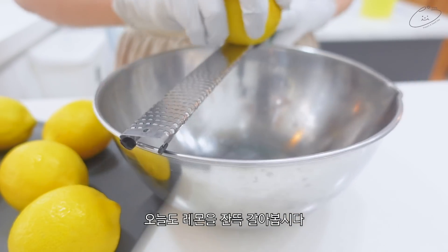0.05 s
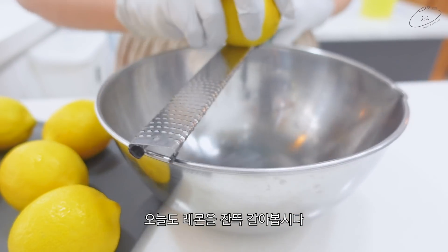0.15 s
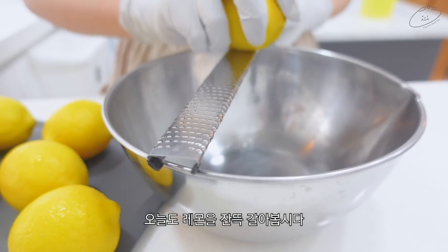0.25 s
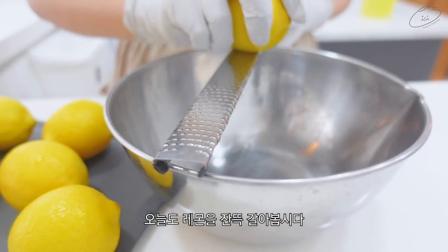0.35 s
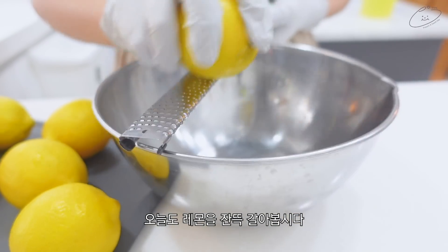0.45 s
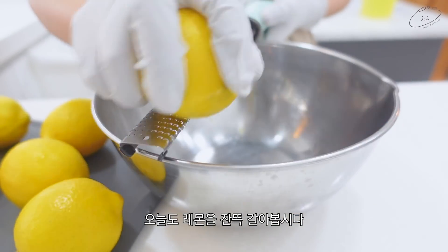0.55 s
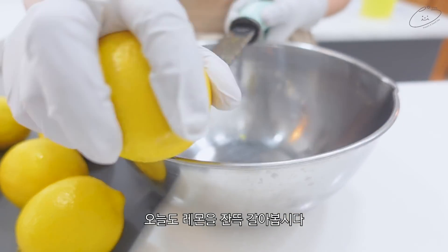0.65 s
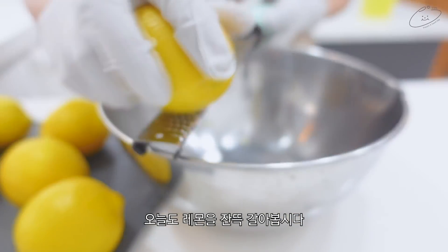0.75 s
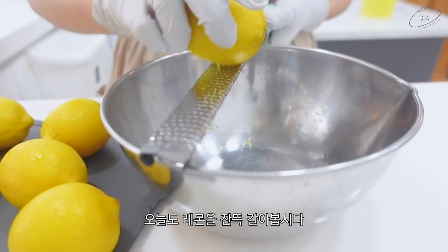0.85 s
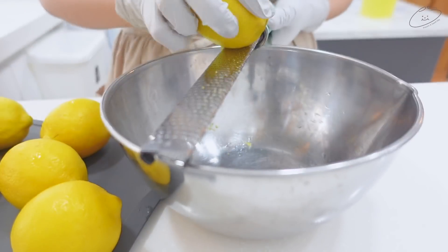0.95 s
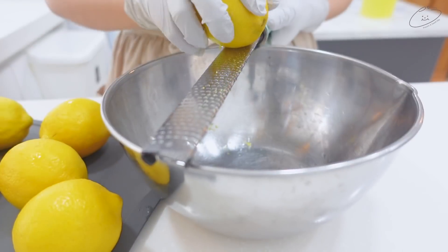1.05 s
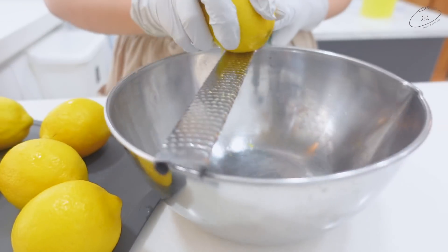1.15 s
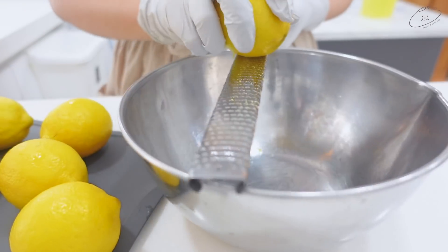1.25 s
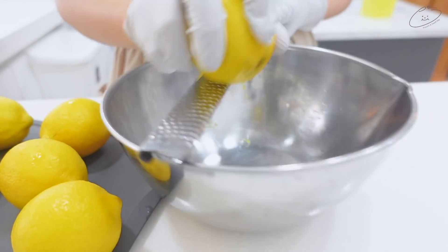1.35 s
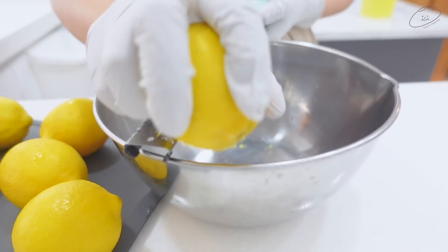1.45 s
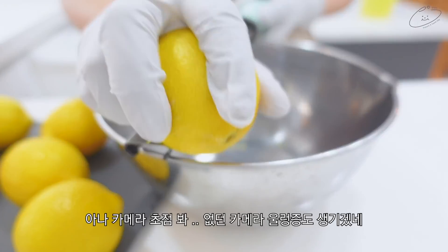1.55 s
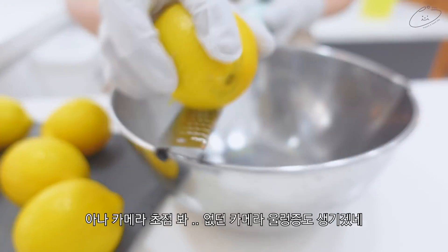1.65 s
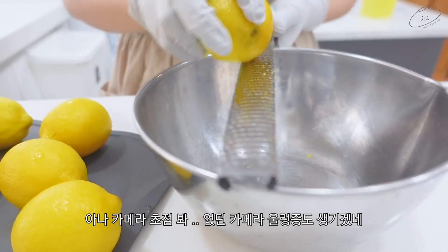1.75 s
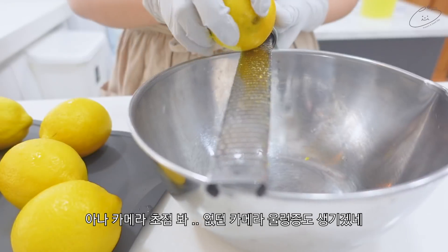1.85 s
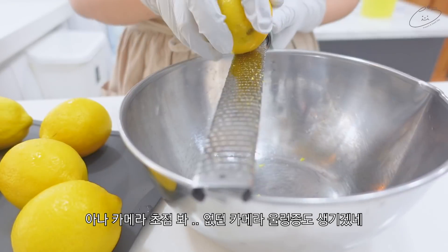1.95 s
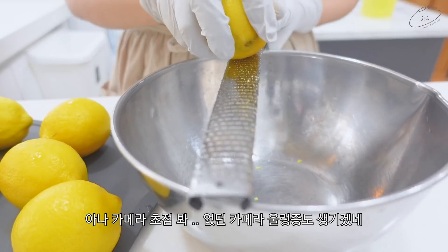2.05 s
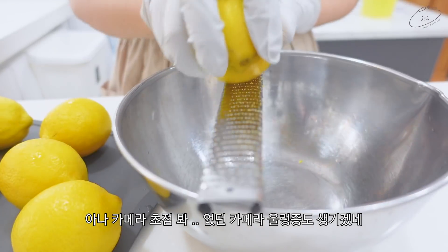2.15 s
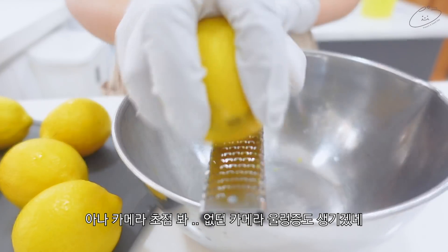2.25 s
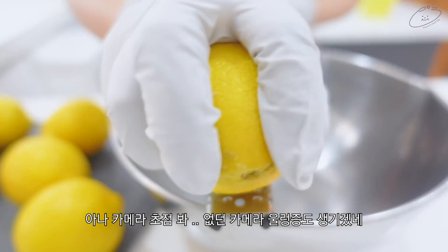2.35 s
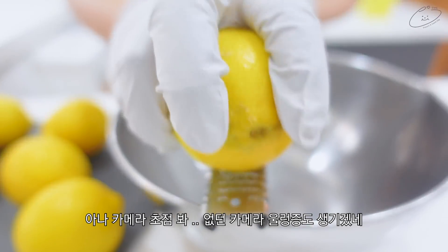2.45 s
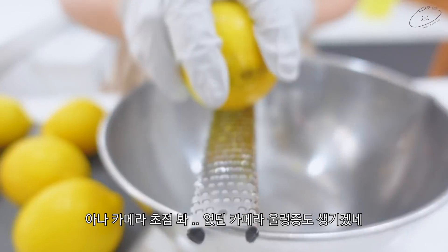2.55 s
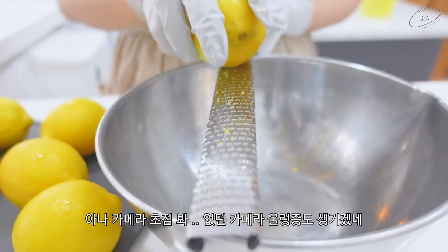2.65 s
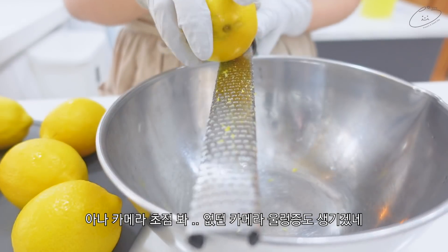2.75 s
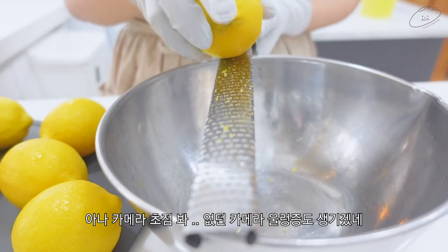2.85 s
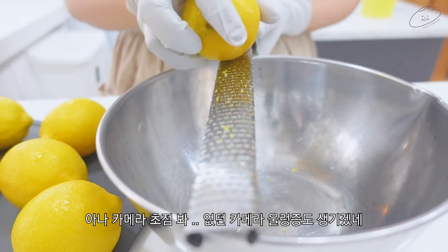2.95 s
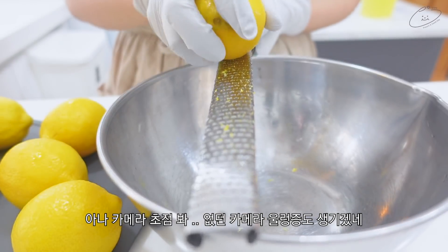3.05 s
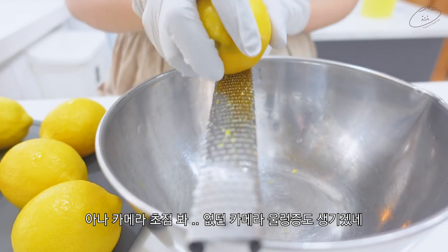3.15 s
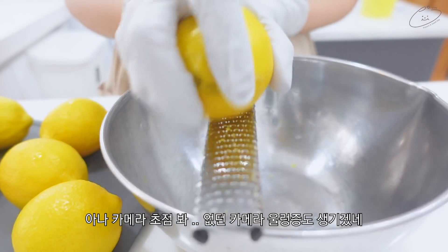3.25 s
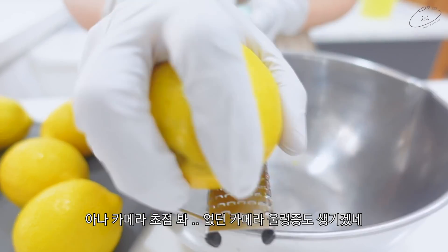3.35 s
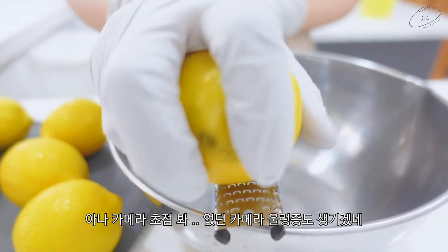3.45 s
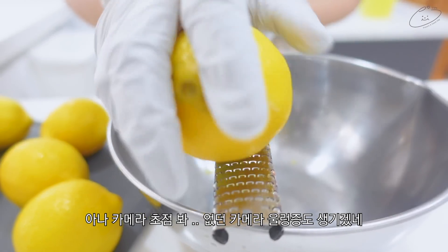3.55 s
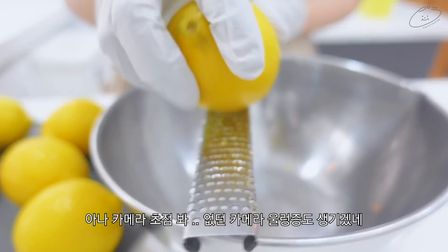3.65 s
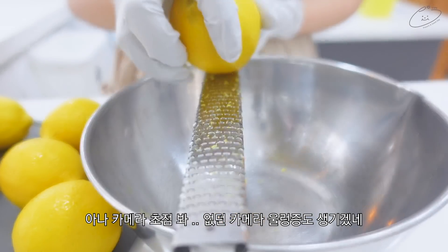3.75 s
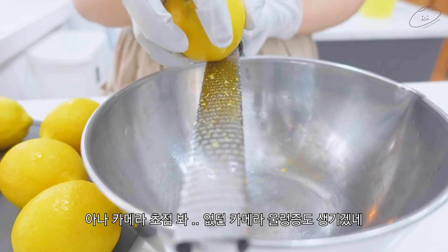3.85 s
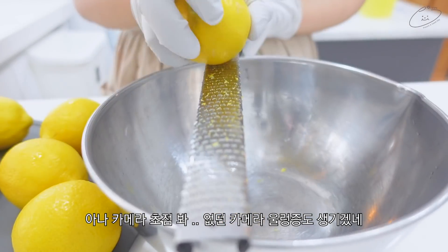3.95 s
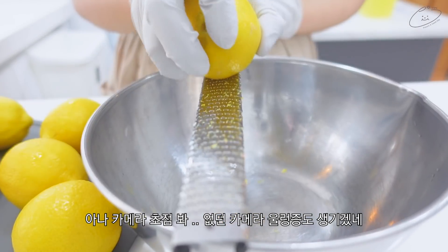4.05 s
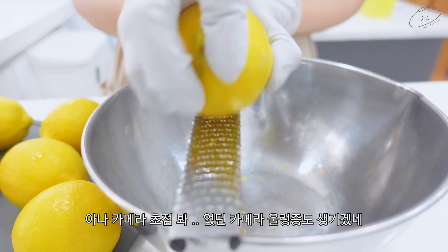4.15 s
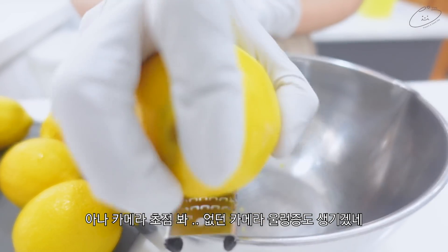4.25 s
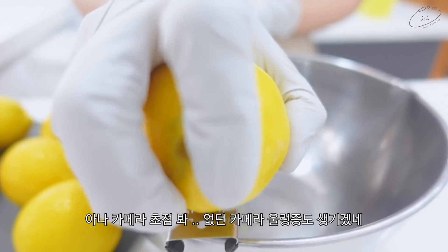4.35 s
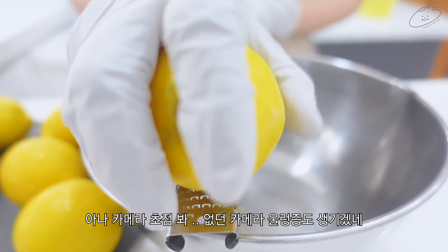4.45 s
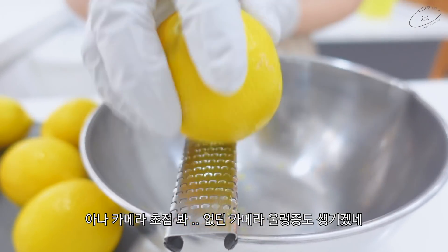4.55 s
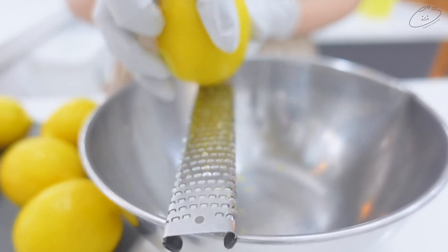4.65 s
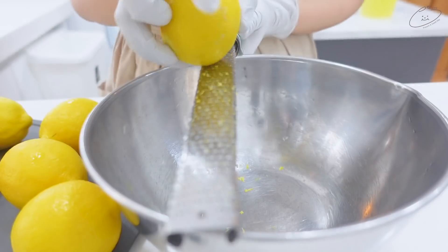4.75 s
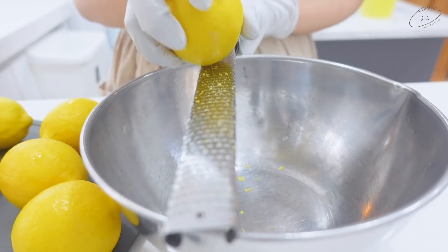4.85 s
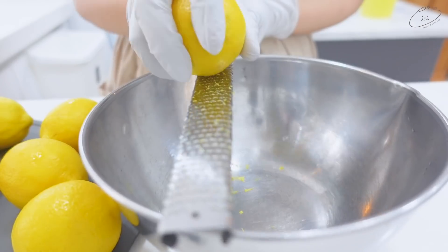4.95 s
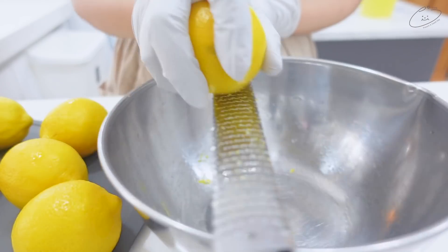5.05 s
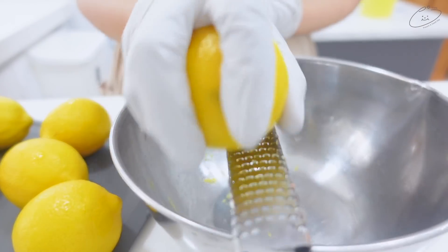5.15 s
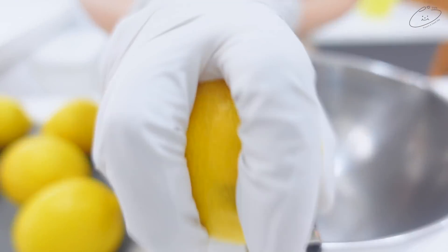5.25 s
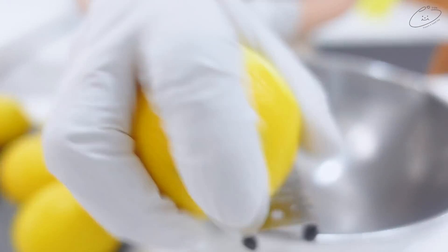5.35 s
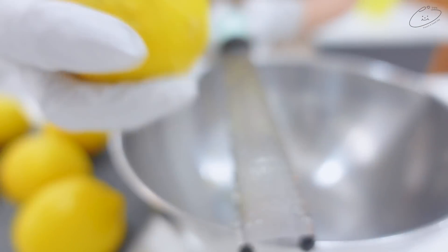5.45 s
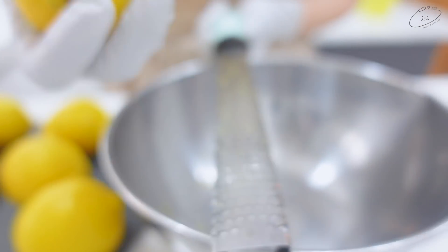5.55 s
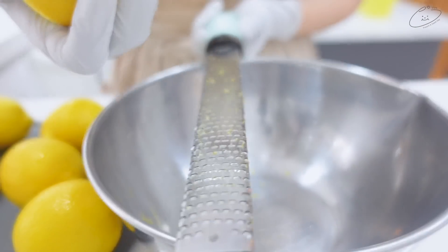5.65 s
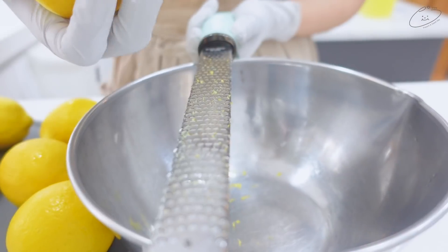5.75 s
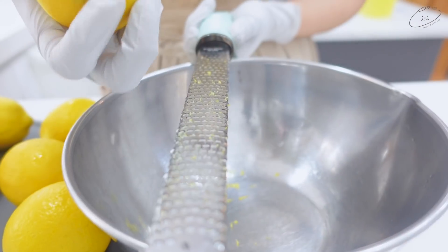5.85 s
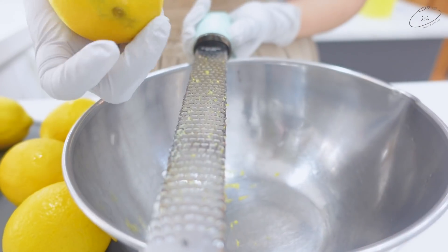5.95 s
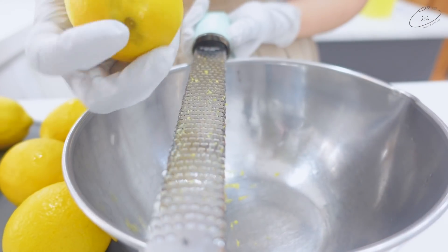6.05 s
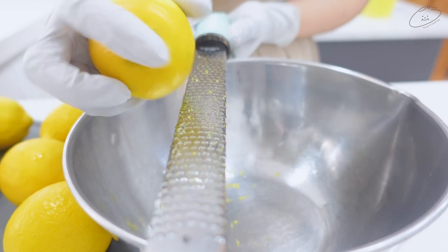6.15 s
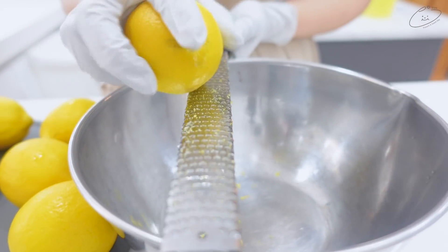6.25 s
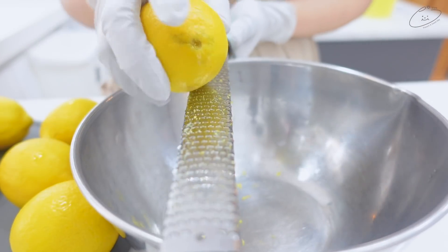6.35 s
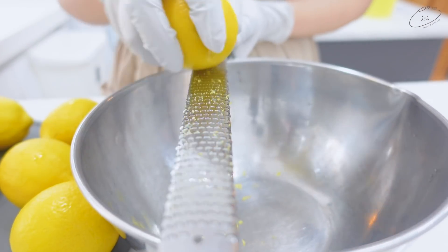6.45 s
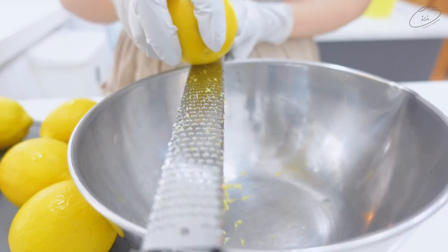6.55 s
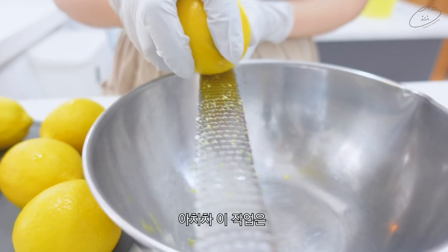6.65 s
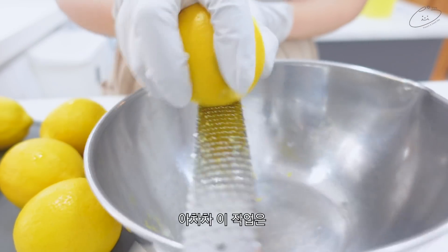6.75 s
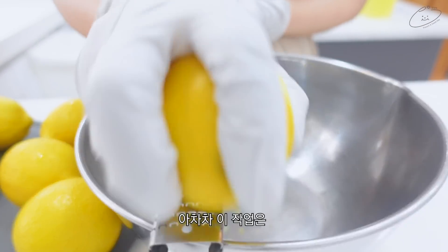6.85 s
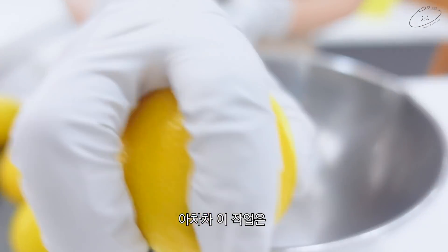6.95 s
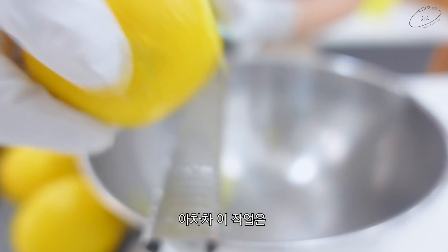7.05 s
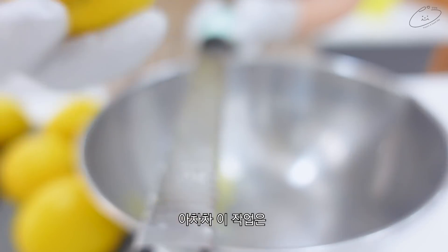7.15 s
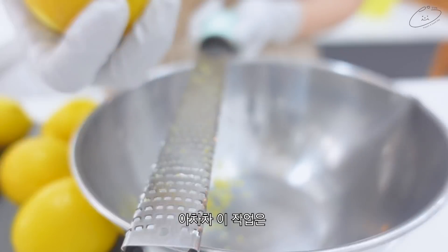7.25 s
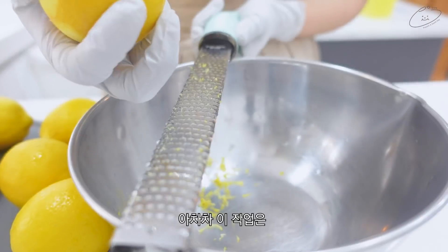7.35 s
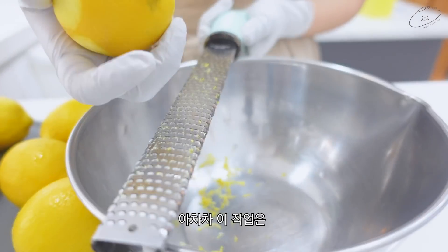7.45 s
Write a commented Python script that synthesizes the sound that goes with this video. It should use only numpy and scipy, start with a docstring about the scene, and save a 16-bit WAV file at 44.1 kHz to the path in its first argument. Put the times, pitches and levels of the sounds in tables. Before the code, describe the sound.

A lemon is grated close by, in seven short, crisp rasps that make a steel grater ring. The strokes come at about 0.4, 1.3, 2.1, 3.1, 4.0, 5.1 and 6.7 seconds, each lasting roughly a third of a second. The peel snags with a sharp knock at 0.5 seconds. Between strokes a rubber glove crinkles softly, with tiny snaps and a faint, thin squeak or two, and the lemon skims lightly back up the teeth. The grater clinks on the rim of a metal bowl several times between 1.8 and 3.2 seconds, then in a quick cluster from 4.6 to 5 seconds, strongest near 4.8. After a quieter stretch of rustling, the last stroke is the loudest, with jolting knocks and a clink around 6.9 seconds. Underneath is a quiet kitchen's low rumble, and a low hum swells twice between 1 and 2.5 seconds.

```python
"""Grating a lemon over a steel bowl

A gloved hand draws a lemon seven times down a steel grater whose foot rests on the rim of a bowl.
The teeth snap through the peel and make the blade ring; now and then the peel snags and jolts it.
Between strokes the glove rustles and squeaks, the lemon skims back up and the grater taps the rim.
We listen from close by, in a quiet kitchen with a low rumble and a hum that swells twice."""
import sys
import numpy as np
from scipy import signal
from scipy.fft import rfft, irfft
from scipy.io import wavfile
from scipy.ndimage import uniform_filter1d

SR = 44100
rng = np.random.default_rng(int(sys.argv[2]) if len(sys.argv) > 2 else 0)


def to_wav(sig):
    """Store sig (one row per channel, or 1-D mono) as 16-bit WAV at the path in sys.argv[1].

    Samples outside -1..1 are clipped; the rate is SR.
    """
    pcm = np.clip(np.atleast_2d(sig), -1, 1) * 32767
    pcm = np.round(pcm).astype(np.int16)
    wavfile.write(sys.argv[1], SR, pcm.T)  # frames by channels


N = 330353
TIME = np.arange(N) / SR  # seconds since the scene began
RING = TIME[:SR // 3]  # seconds since a blow, for short sounds


def undb(db):
    """Turn decibels into a number to multiply by."""
    return 10 ** (np.asarray(db) / 20)


def unit(x):
    """Scale a sound so that its average size (rms) is 1."""
    return x / np.sqrt(np.mean(x ** 2))


def band(x, lo, hi, order=2):
    """Keep what lies between two frequencies."""
    return signal.sosfilt(signal.butter(order, [lo, min(hi, SR * .49)], "band", fs=SR, output="sos"), x)


def highpass(x, hz, order=4):
    """Keep what lies above a frequency."""
    return signal.sosfilt(signal.butter(order, hz, "high", fs=SR, output="sos"), x)


def resonance(x, hz, width):
    """Ring at one pitch; the smaller the width in Hz, the longer the ring."""
    return signal.lfilter(*signal.iirpeak(hz, hz / width, fs=SR), x)


def colour(x, points, size=4096):
    """Shape the tone of a sound along a curve of (frequency [Hz], level [dB]) points."""
    hz, db = np.transpose(points)
    freqs = np.maximum(np.fft.rfftfreq(size, 1 / SR), 1)
    gains = undb(np.interp(np.log(freqs), np.log(hz), db))
    # build the filter so that it never sounds before its input does
    cepstrum = irfft(np.log(gains))
    cepstrum[1:size // 2] *= 2
    cepstrum[size // 2 + 1:] = 0
    response = irfft(np.exp(rfft(cepstrum)))
    return signal.fftconvolve(x, response)[:len(x)]


def walk(rate, size=N):
    """A smooth random wobble of size 1 that turns `rate` times a second."""
    step = max(int(SR / rate), 2)
    stairs = np.repeat(rng.standard_normal(size // step + 1), step)
    return unit(uniform_filter1d(stairs, step)[:size])


def grains(rate, spread_db):
    """Random clicks of uneven size, about `rate` a second."""
    clicks = (rng.random(N) < rate / SR) * rng.choice([-1, 1], N)
    sizes = undb(spread_db * np.clip(rng.standard_normal(N), -2, 2))
    return unit(clicks * sizes)


def fade(t60):
    """Die away by 60 dB in t60 seconds, the fade time."""
    return np.exp(-np.log(1000) * RING / t60)


def ramp(x):
    """A smooth step from 0 to 1."""
    return np.sin(np.pi / 2 * np.clip(x, 0, 1)) ** 2


def swell(start, length, edge_s=0.049):
    """Rise, hold and fall; a short swell has no hold."""
    edge = min(edge_s, length / 2)
    return ramp((TIME - start) / edge) * ramp((start + length - TIME) / edge)


def add(track, start, sound):
    """Mix a sound into a track at a time in seconds."""
    i = int(start * SR)
    track[i:i + len(sound)] += sound[:N - i]


def kitchen(level_db=-43, side_db=-22, air_side_db=-9, swell_db=0.86):
    """The room rumbles almost alike in both ears, with a wider, airy hiss above."""
    # tone of the room's noise: (frequency [Hz], level [dB])
    room_tone = [(25, -20), (42, -29), (60, -14), (90, -7.5), (145, 0.5), (195, 0), (230, -10), (310, -10),
                 (420, -21.5), (800, -19), (1500, -26.5), (2800, -33), (7000, -34.5), (15900, -41.5)]
    mid, side = (unit(colour(rng.standard_normal(N), room_tone)) for _ in range(2))
    mid = mid * undb(level_db + swell_db * walk(3.5))
    side = colour(side, [(200, side_db), (500, air_side_db), (3500, air_side_db), (8000, -14.0)])
    return mid + undb(level_db) * side * np.array([[1], [-1]])


def glove(shift_db=2, crease_db=2.0, middle_db=-0.5, top_db=-3.0):
    """The glove crinkles as the hand goes back and grips anew; each fold shifts its tone."""
    # tone of the crinkle: (frequency [Hz], level [dB])
    crinkle_tone = [(500, -7), (1500, -7.5), (3000, -4), (4500, -4.5), (7000, 1), (10000, -2), (15900, -1)]
    # flexes of the glove: (start [s], length [s], level [dB], extra treble [dB])
    flexes = [(0, .2, -54, -1), (.2, 0.13, -52, -8), (.73, 0.43, -48.5, -0.5), (.89, .09, -42.5, -11),
              (1.134, 0.19, -49, -7), (1.596, 0.34, -48.5, -6), (1.687, 0.18, -41.5, 0),
              (1.898, 0.19, -49.5, -1.5), (2.46, 0.49, -50, 0.5), (2.558, 0.19, -43, 0),
              (2.892, 0.24, -50, -2), (3.52, .31, -46, 1.5), (3.811, 0.23, -49.5, -0.5),
              (4.451, 0.44, -46.5, 0), (4.82, 0.254, -47.5, -2), (5.38, 0.256, -50.5, 1.5),
              (5.809, 0.073, -54.5, 6), (5.88, 0.26, -59.5, 3), (6.125, 0.091, -46.5, 1),
              (6.215, .42, -51.5, 1), (6.343, 0.047, -50, 9), (7.078, 0.31, -57.5, 3),
              (7.127, 0.068, -44, 6)]
    clicks = grains(rate=3500, spread_db=3.5) * undb(1.95 * walk(110))
    crinkle = unit(colour(clicks, crinkle_tone)) * undb(crease_db * walk(25))
    bands = band(crinkle, 500, 5500, order=4), band(crinkle, 5500, 9000, order=4), highpass(crinkle, 9000)
    low, middle, top = (part * undb(shift_db * walk(23)) for part in bands)
    power = treble_power = 0
    for start, length, db, treble_db in flexes:
        flex = (undb(db) * swell(start, length)) ** 2
        power += flex
        treble_power += flex * undb(treble_db) ** 2
    return np.sqrt(power) * (low + undb(middle_db) * middle) + np.sqrt(treble_power) * undb(top_db) * top


def blade(force, place, stiffness=1, second_db=0, wander_db=1.77):
    """The steel rings at many pitches; the lemon's place (0 handle, 1 foot) sets how loud each is."""
    # the blade's rings: (pitch [Hz], width [Hz], level [dB], change from handle to foot [dB])
    rings = [(279.4, 6.5, -14.5, -18), (353.4, 50, -6.5, 12.5), (626, 68, 4, -2.5), (706, 25, -8.5, -5),
             (1209, 21, -16, -5), (1304, 125, -7, -3), (1959, 136, -7, 17.5), (2376, 134, -14, 0),
             (3060, 430, -8, 1), (3754, 147, -4, 5.5), (3946, 110, -9, -19), (4254, 78, -4.5, 7),
             (4425, 82, -6, 2), (4735, 150, -15.5, -13), (5600, 84, -25, 7), (6190, 106, -8, 4),
             (6760, 90, -10, -2), (7200, 68, -13.5, 10), (7600, 90, -10, 16), (7870, 75, -8, 2),
             (8280, 51, -8, 1), (9440, 35, -13, 12), (10130, 240, -21, -7)]
    out = 0
    for hz, width, db, travel_db in rings:
        # the grip tunes the main pair of bending rings and frees or muffles the second pair
        tuned_hz = hz * stiffness if 500 < hz < 1000 else hz
        freed_db = second_db if 1000 < hz < 1600 else 0
        drive = undb(db + freed_db + travel_db * (place - .5) + wander_db * walk(18, size=len(force)))
        out += resonance(force * drive, tuned_hz, width)
    return out


def skims(gain_db=-1, top_db=-12):
    """A few teeth catch lightly as the lemon slides back up the blade."""
    # light touches: (start [s], length [s], level [dB])
    touches = [(0, 0.22, -57), (.265, 0.055, -50), (0.754, 0.35, -48.5), (0.896, 0.094, -42),
               (1.186, 0.13, -49), (1.655, 0.27, -45), (1.747, 0.097, -34.5), (2.47, 0.15, -53),
               (2.564, 0.22, -40), (3.502, 0.1, -48.5), (3.642, 0.23, -46.5), (3.838, 0.24, -54.5),
               (4.41, 0.069, -46), (4.87, 0.19, -49.5), (5.055, .04, -41), (5.514, .08, -45.5),
               (6.474, 0.13, -48.5), (7.005, .055, -36), (7.03, .09, -48)]
    level = np.sqrt(sum((undb(db) * swell(start, length)) ** 2 for start, length, db in touches))
    ringing = blade(grains(rate=990, spread_db=4.5), place=.1, stiffness=1.064)
    skim = unit(colour(ringing, [(250, 5.0), (700, 0.0), (1400, 1), (3000, top_db), (9000, top_db)]))
    return undb(gain_db) * level * skim


def squeaks(hz=6660, width_hz=130):
    """The rubber glove sticks and slips on the peel in a thin, unsteady note."""
    # slips of the glove: (start [s], length [s], level [dB])
    slips = [(0, 0.39, -66), (1.25, 0.098, -51), (5.617, 0.3, -61)]
    note = unit(band(rng.standard_normal(N), hz - width_hz / 2, hz + width_hz / 2, order=1))
    return note * sum(undb(db) * swell(start, length) for start, length, db in slips)


def snaps(gain_db=-4, t60=0.012, edge_ratio=1.38):
    """Single crinkles of the glove and flicks of zest, each a tiny burst of noise."""
    # tiny snaps: (time [s], level [dB], centre frequency [Hz])
    flicks = [(0.156, -32.5, 3600), (0.8858, -23.5, 5570), (0.9792, -39, 4060), (2.1535, -22, 6250),
              (2.797, -30.5, 9870), (5.1043, -27, 3900), (5.573, -37, 9310), (5.8421, -35, 6590),
              (6.136, -36, 6350), (6.3487, -29.5, 8240), (6.556, -38, 7880), (7.002, -19.5, 9000)]
    out = np.zeros(N)
    for start, db, hz in flicks:
        noise = unit(band(rng.standard_normal(len(RING)), hz / edge_ratio, hz * edge_ratio))
        add(out, start, undb(db + gain_db) * noise * fade(t60))
    return out


def rasping(tooth_rate=7000, spread_db=3.0, row_rate=330, row_db=0.74, grip_db=0.9, judder_db=1.0,
            ring_db=9, bend_fall_db=-3, foot_ring_db=2.5, tear_fall_db=-5, tear_slowing_db=-2.5):
    """Teeth snap through the peel: slow tugs bend the blade, quick snaps ring it, the peel hisses."""
    # strokes down the blade; the short one is the lemon settling on the teeth:
    # (start [s], length [s], speeding up [s], slowing down [s], level [dB], extra bending [dB],
    #  extra tearing [dB], first place [0-1], last place [0-1], pitch of the main rings [ratio],
    #  boost of the second pair of rings [dB])
    strokes = [(0.421, 0.35, 0.037, 0.12, -31, -0.044, -3, .02, 0.26, 1.1, -3.5),
               (1.336, 0.28, 0.046, 0.22, -28, 1.4, 0, 0.15, 0.67, 1.06, -1.5),
               (2.108, .34, .12, 0.094, -29, 0.98, -0.8, 0.13, 0.93, 1.004, 0),
               (3.142, .352, .16, 0.14, -29, 1.2, 0.5, .05, 0.92, 1.02, 3.5),
               (4.029, 0.39, .23, 0.2, -26.5, 3, 0, .08, 0.75, 1.027, 2),
               (5.062, 0.35, 0.15, 0.15, -26.5, -1.5, -3, .27, 0.97, 1.017, -1),
               (6.675, 0.075, 0.039, 0.043, -41.5, 1.8, -4.5, .1, .16, 0.99, -8),
               (6.722, 0.34, 0.2, 0.31, -18.5, 1.8, -1.5, 0.35, 1, 1.023, 0)]
    # tone of the tearing peel: (frequency [Hz], level [dB])
    peel_tone = [(80, -11), (200, -12), (310, -3.5), (470, -8.5), (800, -9.5), (1050, -8), (1650, -8.5),
                 (2400, -5), (4300, -1.5), (5200, -5.5), (8000, -6.5), (10000, -6.5), (15900, -9)]
    flurries = undb(row_db * walk(row_rate) + grip_db * walk(35))
    tooth_clicks = flurries * grains(tooth_rate, spread_db)
    peel = colour(flurries * grains(tooth_rate, spread_db), peel_tone)
    judder = undb(judder_db * walk(90))
    out = np.zeros(N)
    for start, length, attack, release, db, bend_db, tear_db, first, last, stiffness, boost_db in strokes:
        on = (TIME >= start) & (TIME < start + length)
        age = TIME[on] - start
        travel = age / length
        ending = ramp((length - age) / release)  # falls to 0 as the hand stops
        speed = ramp(age / attack) * ending
        place = first + (last - first) * travel
        sound = undb(ring_db) * blade(tooth_clicks[on], place, stiffness, boost_db) + peel[on]
        # towards its foot the blade is stiffer and rings more freely
        bend = unit(band(sound, 74, 1480, order=4)) * undb(bend_db + bend_fall_db * travel) * judder[on]
        rasp = unit(band(sound, 1505, 7250, order=4)) * undb(foot_ring_db * travel ** 4)
        # the tearing dulls as the teeth fill and the hand slows
        dulling_db = tear_fall_db * travel + tear_slowing_db * (1 - ending)
        tear = unit(highpass(sound, 6750)) * undb(tear_db + dulling_db)
        out[on] += undb(db) * speed * (bend + rasp + tear)
    return out


def jolts(thud_t60=0.2, overtone_ratio=2.37, overtone_db=-9, overtone_t60=0.0094):
    """A snag lets go: the blade swings briefly in the hand and the bowl thuds on the counter."""
    # snags of the peel: (time [s], level [dB], pitch [Hz], fade time [s], thud boost [dB])
    snags = [(.437, -31, 734, 0.12, -30), (.458, -18.5, 617, 0.017, -11), (.464, -30, 300, .2, -22),
             (0.5012, 2, 870, 0.0081, -29), (.903, -28, 620, 0.03, -6.5), (1.365, -19.5, 620, 0.019, -5.5),
             (1.372, -31, 286, 0.21, -14), (1.808, -31.5, 712, 0.074, -9), (4.722, -28.5, 733, 0.064, -18),
             (6.268, -34.5, 640, 0.036, -10.5), (6.584, -33, 700, 0.021, -14),
             (6.709, -33.5, 650, 0.079, -30), (6.8975, -5, 634, 0.024, -11.5),
             (6.921, -5, 560, 0.012, -19.5)]
    # tone of the bowl's thud: (frequency [Hz], level [dB])
    thud_tone = [(55, -35), (100, 8), (250, -0.5), (500, -1), (1000, -10), (2200, -18), (4000, -20.5)]
    out = np.zeros(N)
    for start, db, hz, t60, thud_db in snags:
        phase = 2 * np.pi * hz * RING
        # the soft peel stops the higher note almost at once
        overtone = undb(overtone_db) * np.sin(overtone_ratio * phase) * fade(overtone_t60)
        swing = 2 * (np.sin(phase) * fade(t60) + overtone) * (1 - fade(0.014))
        thud = unit(colour(rng.standard_normal(len(RING)), thud_tone)) * fade(thud_t60)
        add(out, start, undb(db) * (swing + undb(thud_db) * thud))
    return out


def hum(start_hz=114.8, sink_hz_per_s=9.3, waver=.002):
    """One low tone from further off swells twice while its pitch slowly sinks."""
    # swells of the hum: (start [s], length [s], level [dB])
    swells = [(1.083, 0.62, -37), (1.657, 0.88, -37.5)]
    age = TIME - swells[0][0]
    hz = (start_hz - sink_hz_per_s * age) * (1 + waver * walk(200))
    level = sum(undb(db) * swell(start, length, edge_s=0.22) for start, length, db in swells)
    return level * np.sqrt(2) * np.sin(2 * np.pi * np.cumsum(hz) / SR)


def taps(ring_db=-15, crack_db=-3, low_db=4, crack_t60=0.038, shimmer_db=-16, shimmer_t60=0.25,
         scatter_db=4.0, detune=0.0131, chatter=0.33):
    """The grater's foot strikes the bowl's rim; each blow rings both in a slightly different way."""
    # blows on the rim: (time [s], level [dB], boost of the low rings [dB])
    blows = [(1.7818, -24, -10), (2.0705, -21.5, -7.5), (2.603, -24, -3.5), (2.6239, -24, -6),
             (2.7347, -29.5, -6), (3.0085, -30, -4.5), (3.1572, -23, -6), (4.6208, -24, -6),
             (4.6868, -19.5, -5), (4.7447, -17.5, -2.5), (4.7824, -8, -4), (4.9838, -18.5, -3),
             (6.5844, -35, -4.5), (6.9104, -12.5, -5)]
    # grater and bowl ringing together: (pitch [Hz], level [dB], fade time [s])
    rings = [(676, 12, 0.051), (820, -1, 0.02), (1327, 5, 0.067), (2000, -9, 0.061), (2900, -8.5, 0.065),
             (3860, -9.5, 0.076), (5260, -22, .06), (6420, 1, 0.063), (6900, -4, 0.084), (7860, 5, 0.032),
             (8450, 0, 0.081), (9240, -5.5, 0.081), (9695, -12, 0.055)]
    # tone of steel hitting steel: (frequency [Hz], level [dB])
    crack_tone = [(200, -14), (430, -11), (800, 5.5), (1100, 5), (3500, -6.5), (6500, 0.5), (9000, 0),
                  (11000, -2.5), (15500, -5)]
    # the foot chatters once for each swing of the lowest ring
    bounces = 1 + chatter * np.cos(2 * np.pi * rings[0][0] * RING)
    out = np.zeros(N)
    for start, db, boost_db in blows:
        crack = colour(rng.standard_normal(len(RING)) * bounces * fade(crack_t60), crack_tone)
        # the bowl's many close, high rings blur into a shimmer
        shimmer = band(rng.standard_normal(len(RING)), 5500, 11000) * fade(shimmer_t60)
        ring = 0
        for k, (hz, level_db, t60) in enumerate(rings):
            extra_db = boost_db + low_db if hz < 2500 else scatter_db * rng.standard_normal()
            tuned_hz = hz * (1 + detune * rng.standard_normal())
            tone = (-1) ** k * np.sin(2 * np.pi * tuned_hz * RING)
            ring += undb(level_db + extra_db) * fade(t60) * tone
        tap = undb(ring_db) * highpass(ring, 480) + undb(crack_db) * crack + undb(shimmer_db) * shimmer
        add(out, start, undb(db) * tap * (1 - fade(0.0071)))
    return out


def reflections(x, t60):
    """Scattered echoes from bowl, counter and walls."""
    tail = rng.standard_normal(len(RING)) * fade(t60) * (RING > .002)
    return signal.fftconvolve(x, tail / np.linalg.norm(tail))[:N]


def scene(room_db=-17, room_t60=0.47, side_db=-18.5, balance_db=-0.07):
    """The grater sits straight ahead in the kitchen; its echoes differ between the ears."""
    near = rasping() + glove() + skims() + squeaks() + taps() + jolts() + snaps()
    mid = near + undb(room_db) * reflections(near, room_t60)
    # tone of the echoes that differ between the ears: (frequency [Hz], level [dB])
    side_tone = [(100, -21), (300, 4.5), (700, -11.5), (2300, -21), (4400, 2), (14000, 0.0)]
    side = undb(side_db) * colour(reflections(near, t60=0.22), side_tone)
    ears = np.array([[1], [-1]])
    return (mid + ears * side) * undb(ears * balance_db) + kitchen() + hum()


def record(dry):
    """The microphone loses the deepest bass, and the highest treble is cut off steeply."""
    top_hz = 15950
    thin = highpass(dry, 48, order=2)
    return signal.sosfilt(signal.ellip(12, .1, 80, top_hz, fs=SR, output="sos"), thin)


dry = scene()
out = record(dry)
to_wav(out)
```